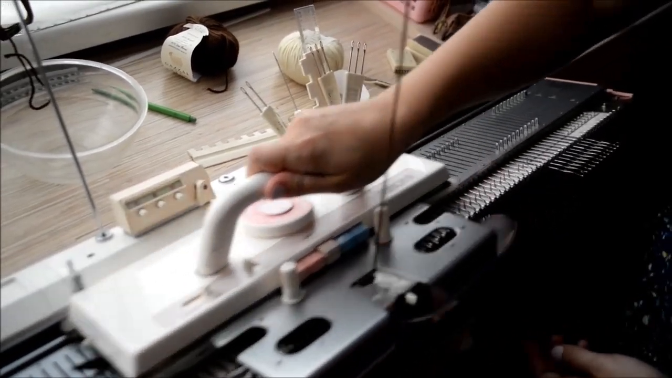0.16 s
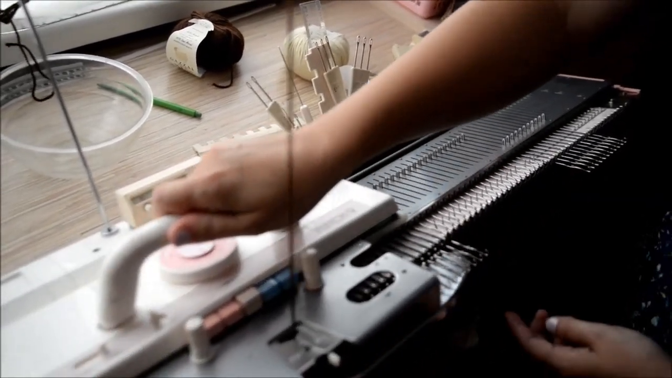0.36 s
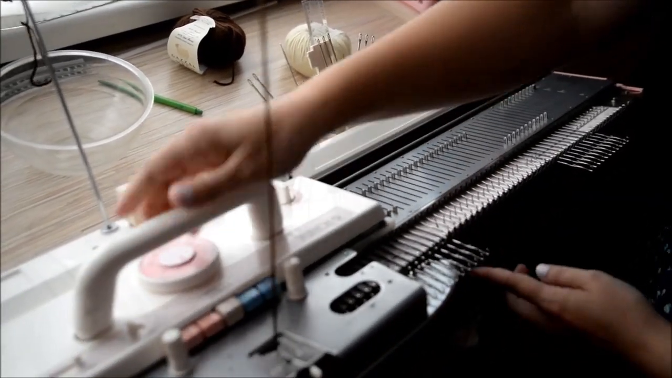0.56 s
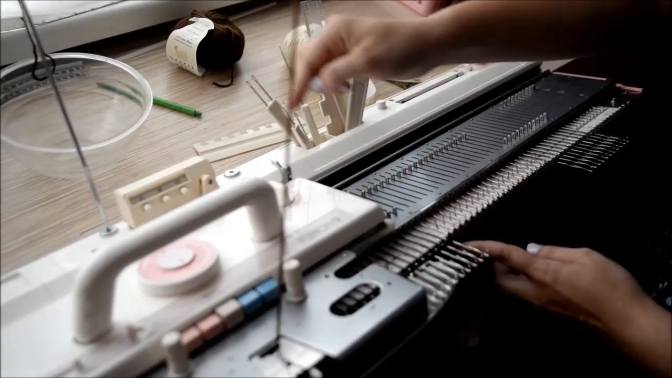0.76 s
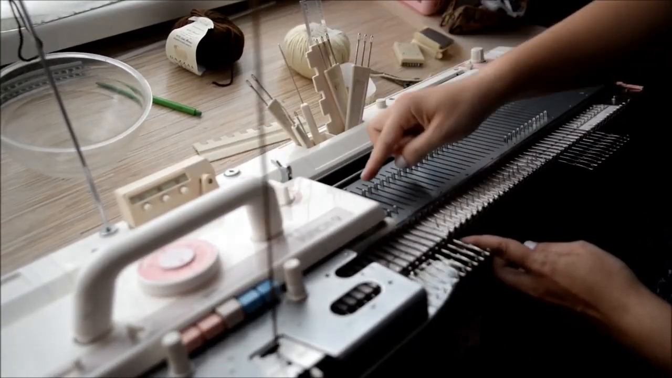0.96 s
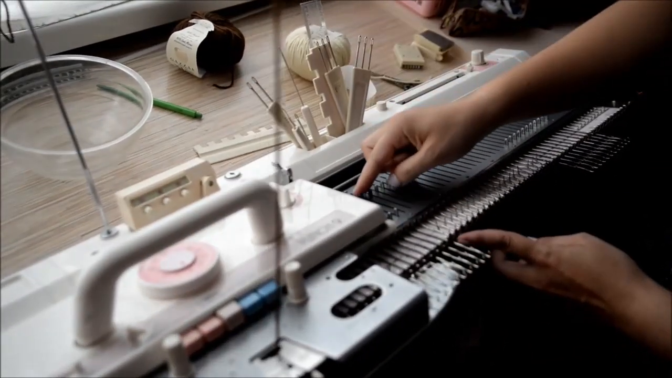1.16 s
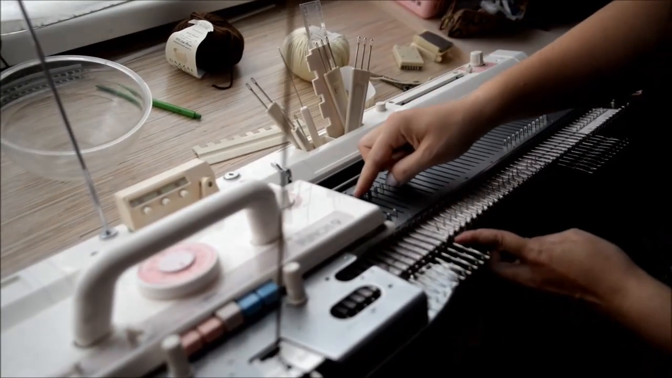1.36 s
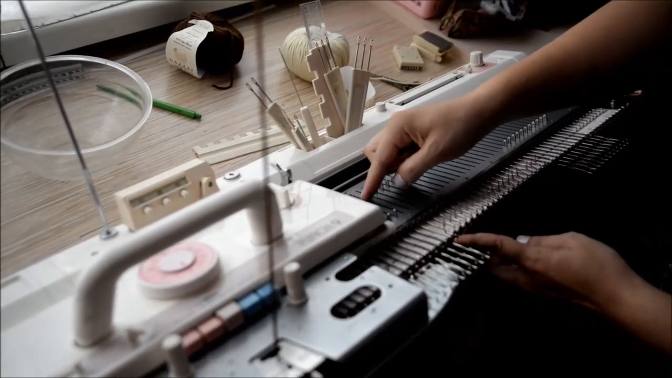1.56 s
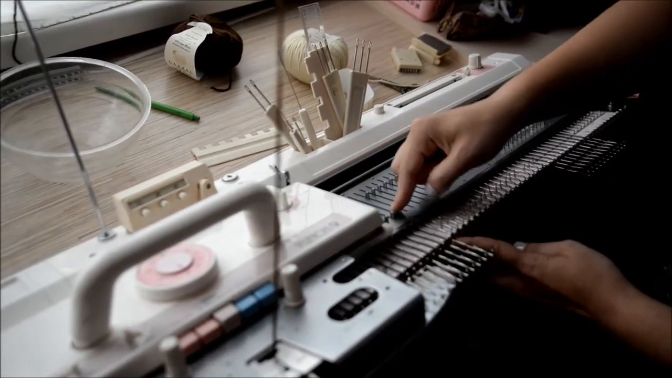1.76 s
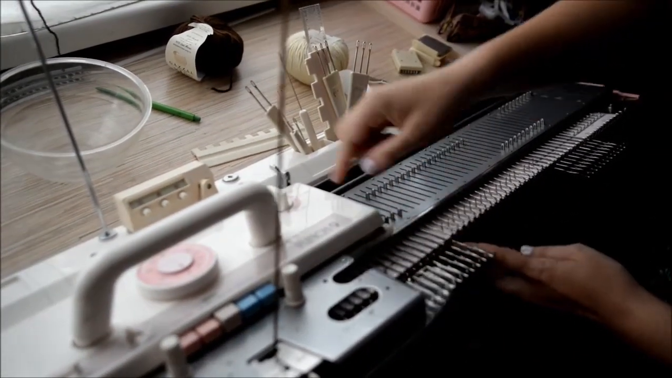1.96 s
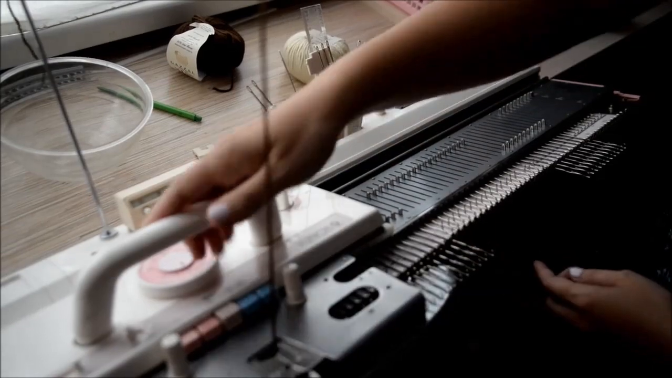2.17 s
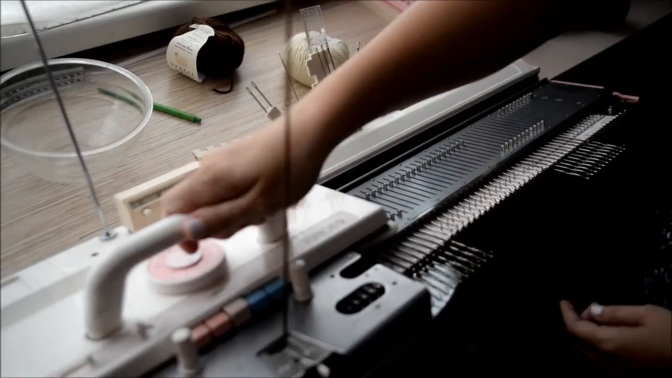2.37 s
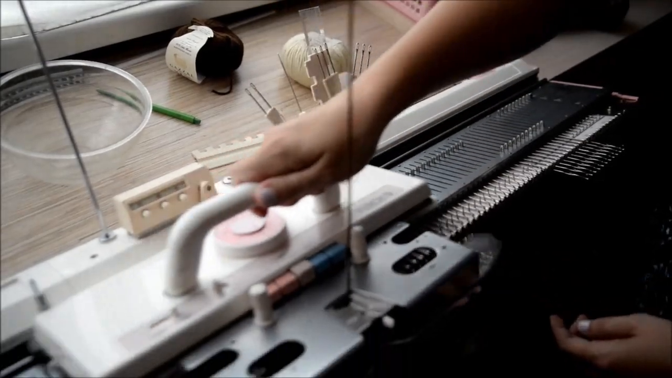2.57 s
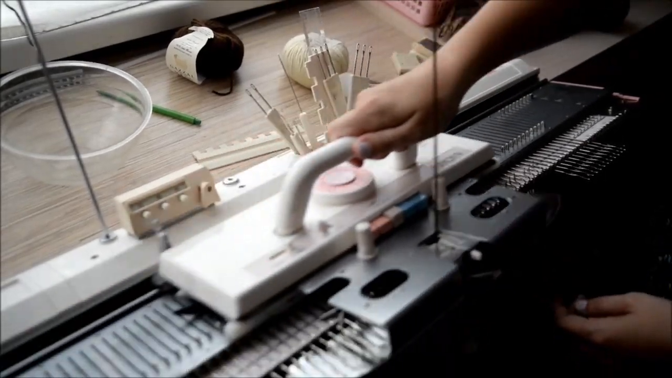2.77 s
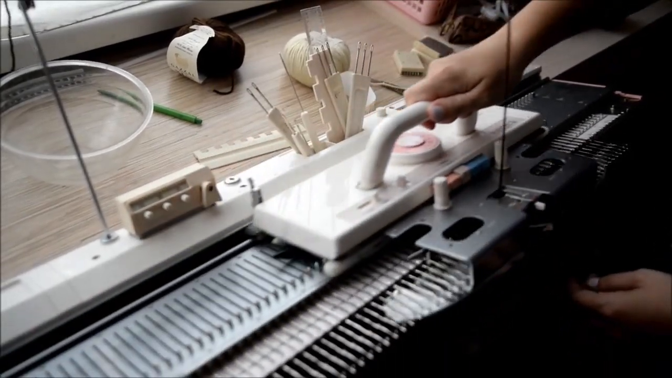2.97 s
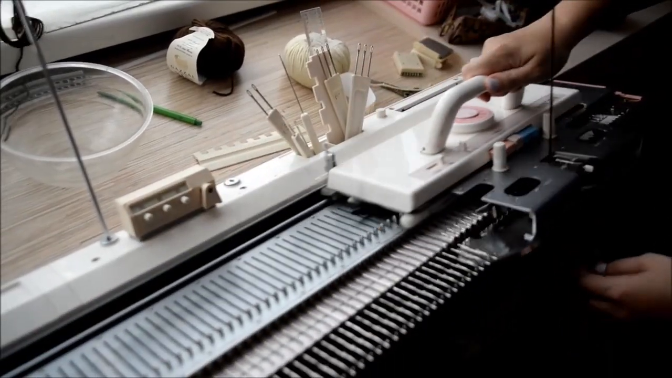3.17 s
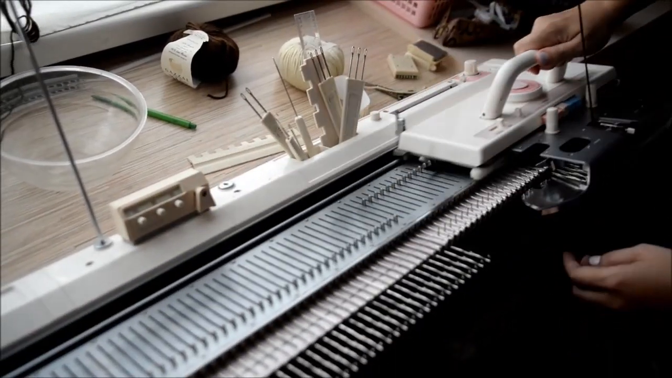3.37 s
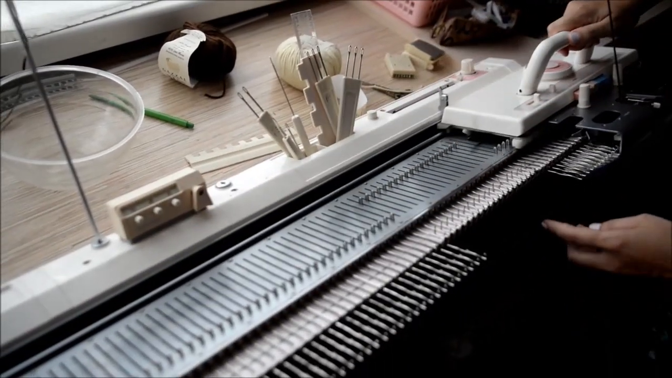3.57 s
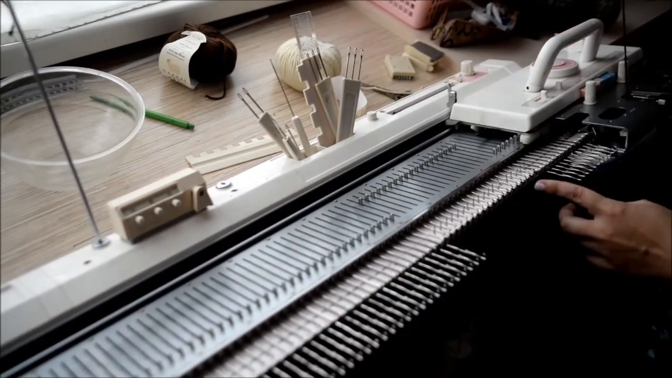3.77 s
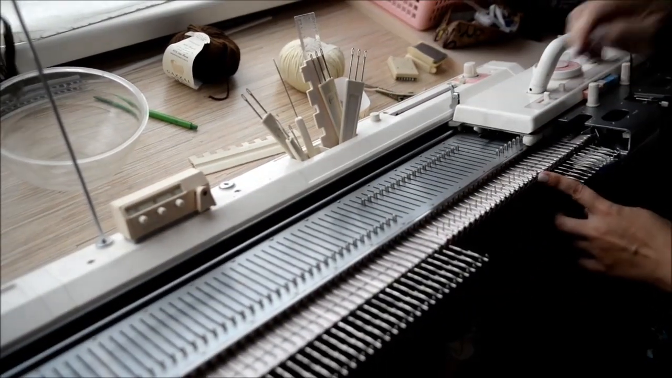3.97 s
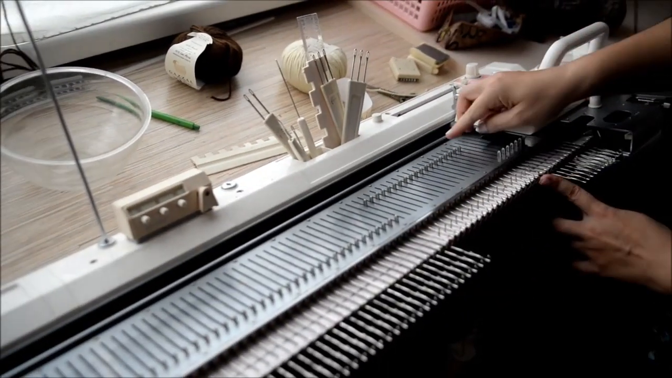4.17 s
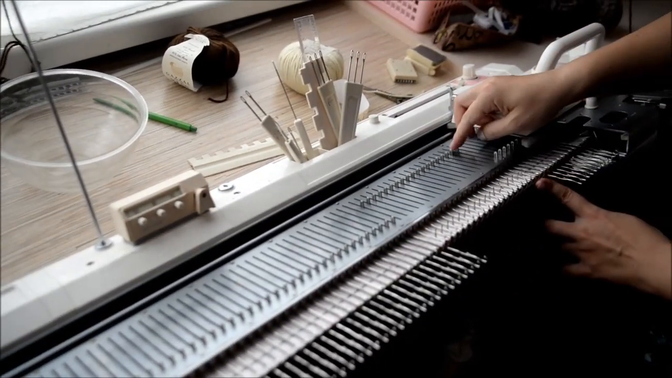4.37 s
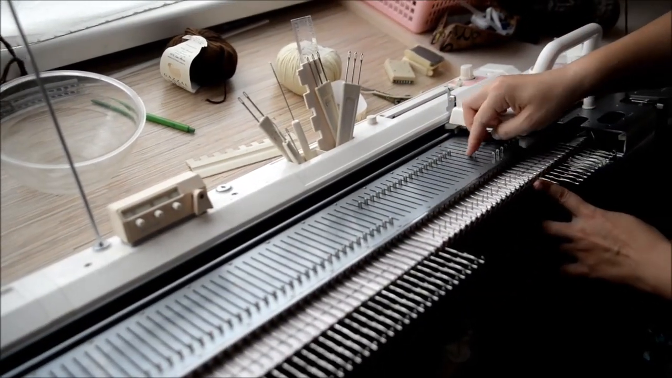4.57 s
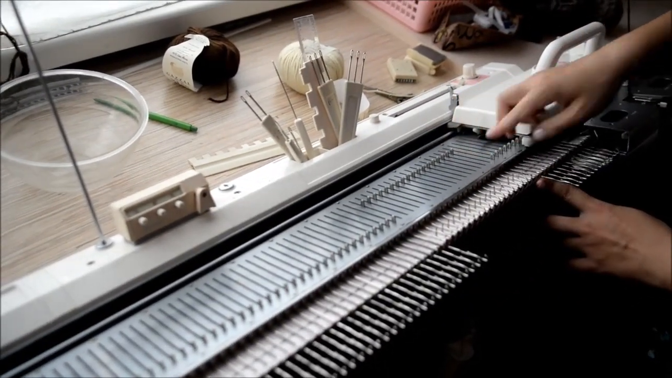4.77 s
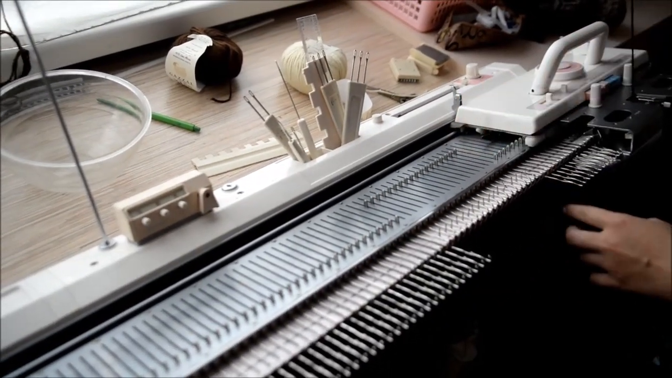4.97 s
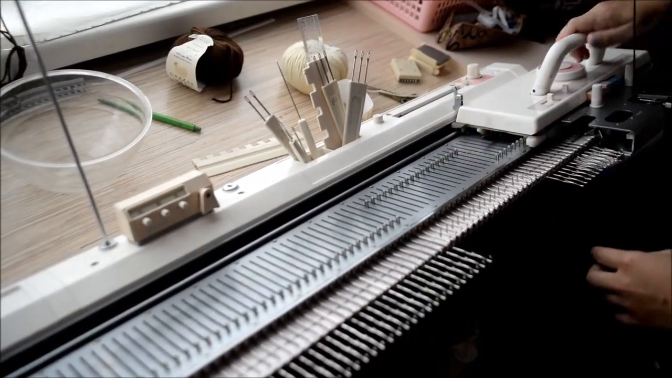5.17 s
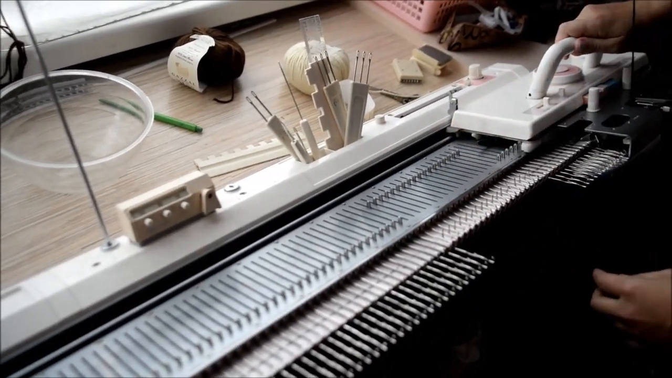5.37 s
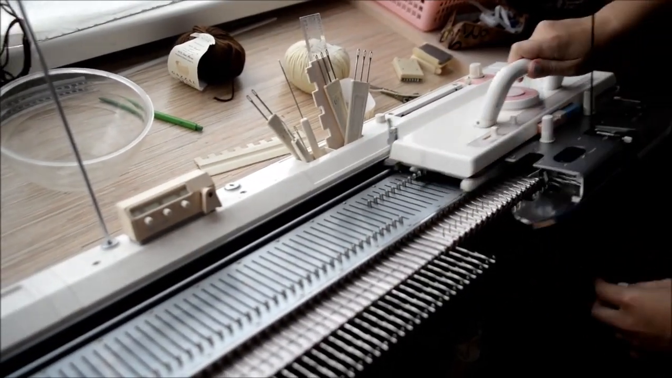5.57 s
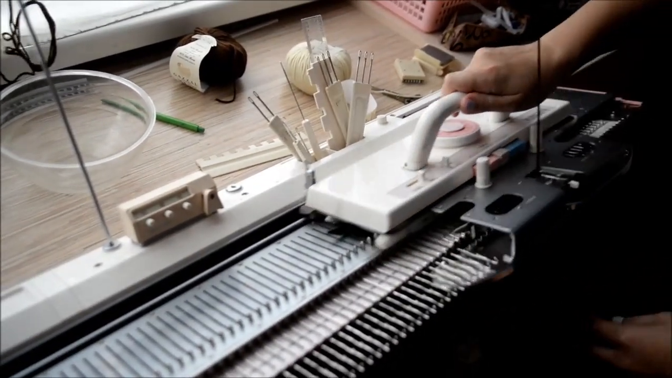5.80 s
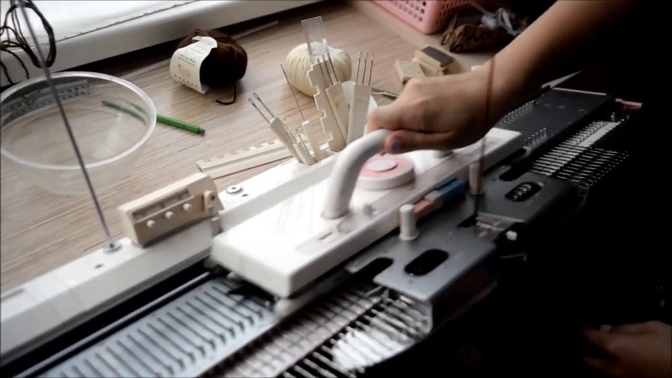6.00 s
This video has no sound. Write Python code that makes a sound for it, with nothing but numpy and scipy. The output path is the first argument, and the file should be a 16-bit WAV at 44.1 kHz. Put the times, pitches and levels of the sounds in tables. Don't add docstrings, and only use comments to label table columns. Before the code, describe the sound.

Close in a small furnished room, a knitting machine carriage clatters along steel needles, slowing to a stop. Faint skin rubs and light metal clicks follow, then a long rattling pass swells and eases. More soft brushing, a loud needle snap and a dull handle bump lead into a third pass, building until it is cut off. Quiet hum and hiss lie behind.

```python
import sys
import numpy as np
from scipy import signal
from scipy.fft import rfft, irfft, next_fast_len
from scipy.io import wavfile
from scipy.ndimage import uniform_filter1d

SR = 44100
rng = np.random.default_rng(int(sys.argv[2]) if len(sys.argv) > 2 else 0)


def wav_record(signal):
    frames = np.transpose(np.atleast_2d(signal))
    bounded = np.clip(frames, -1, 1)
    quanta = np.round(bounded * 32767).astype(np.int16)
    wavfile.write(sys.argv[1], SR, quanta)


def invert_db(x):
    u = np.asarray(x, float) / 20
    return 10 ** u


N = 266231
T = np.arange(N) / SR
SIZE = next_fast_len(N + SR)
HZ = np.maximum(np.arange(SIZE // 2 + 1) * SR / SIZE, 1)


def unit(x):
    return x / np.sqrt(np.mean(x ** 2))


def shape(points, rings=()):
    hz, db = np.transpose(points)
    out = np.interp(np.log(HZ), np.log(hz), db)
    for f, width, lift in rings:
        nearness = 1 / (1 + (2 * (HZ - f) / width) ** 2)
        out = out + 20 * np.log10(1 + (invert_db(lift) - 1) * nearness)
    return out


def ring(x, db):
    cep = irfft(db * np.log(10) / 20, SIZE)
    cep[1:SIZE // 2] *= 2
    cep[SIZE // 2 + 1:] = 0
    return irfft(rfft(x, SIZE) * np.exp(rfft(cep)), SIZE)[:len(x)]


def bands(x, edges_hz):
    spectrum = rfft(x, SIZE)
    lows = [irfft(spectrum / (1 + (HZ / f) ** 8), SIZE)[:len(x)] for f in edges_hz]
    return np.diff([0 * x] + lows + [x], axis=0)


def walk(rate):
    k = int(SR / rate)
    held = np.repeat(rng.standard_normal(N // k + 1), k)
    return uniform_filter1d(uniform_filter1d(held, k), k)[:N]


def fade(impulses, seconds):
    return signal.lfilter([1], [1, -np.exp(-1 / (seconds * SR))], impulses)


def narrow(hz, db, width_hz):
    pole = np.exp(-np.pi * width_hz / SR)
    push = signal.lfilter([1], [1, -pole], rng.standard_normal((2, N)))
    turn = np.exp(2j * np.pi * np.cumsum(hz + 0 * T) / SR)
    return invert_db(db) * unit(np.real((push[0] + 1j * push[1]) * turn))


def small_rings(rows):
    out = np.zeros(N)
    for s, db, hz, t60 in rows:
        t = np.maximum(T - s, 0)
        envelope = np.minimum(t * hz / 0.87, 1) * np.exp(-np.log(1000) * t / t60)
        out += invert_db(db) * envelope * np.sin(2 * np.pi * hz * t)
    return out * invert_db(4.1 * walk(120))


# f/Hz, level/dB per Hz
ROOM_TONE = [(15, -45), (25, 0), (87, -11), (149, -1.5), (229, -6.5), (354, -6), (714, -11.5), (818, -8.5),
             (936, -12.5), (1040, -9), (1740, -19.5), (5570, -23.5), (7310, -29), (14800, -31),
             (16000, -41.5)]
ROOM_TONE_DB = -59.5


def hush():
    hums = [(141, 15, 8.3), (228.5, 35, 6), (1210, 16, 1.6), (985, 37, 1.7)]
    tone = ring(rng.standard_normal(N), shape(ROOM_TONE, hums))
    *low_bands, hiss = bands(tone, (90, 190, 400, 900, 2000))
    wandering = sum(band * invert_db(1.8 * walk(1.3)) for band in low_bands)
    return invert_db(ROOM_TONE_DB) * unit(hiss + wandering)


def far_appliance():
    middle_s, half_s, whine_hz, whine_db = 5.17, .17, 1205, -69
    swell = np.exp(-((T - middle_s) / half_s) ** 2)
    return swell * narrow(whine_hz, whine_db + 4.6 * walk(15), 30.)


# f/Hz, level/dB per Hz
SKIN_COLOUR = [(500, -23.5), (1200, -2.5), (2500, -6.5), (4000, -4), (5500, -3), (7000, -5), (8300, -17.5),
               (14000, -33)]
# start t/s, length t/s, level/dB
STROKES = [
    (1.74, 0.024, -58),
    (2.2, 0.023, -62),
    (4.033, .12, -59),
    (4.278, .015, -64),
    (4.525, .03, -64),
    (4.614, 0.017, -47.5),
]
# middle t/s, half length t/s, level/dB
RUSTLES = [
    (0.599, 0.18, -67.5),
    (1.7, 0.12, -81),
    (1.816, 0.077, -60),
    (2.155, .17, -66.5),
    (3.72, 0.088, -55.5),
    (3.95, .15, -69.5),
    (4.175, 0.059, -63.5),
    (4.48, .1, -71),
    (4.85, 0.21, -69),
    (5.36, 0.054, -66),
]


def finger():
    resting_db, attack_s, release_s = -77.5, .006, 0.01
    grain = rng.standard_normal(N) * invert_db(3. * walk(60))
    gain = invert_db(resting_db)
    for s, half, db in RUSTLES:
        gain = gain + invert_db(db) * np.exp(-((T - s) / half) ** 2)
    for s, length, db in STROKES:
        attack = np.clip((T - s) / attack_s + .5, 0, 1)
        release = np.exp(-np.maximum(T - s - length, 0) / release_s)
        gain = gain + invert_db(db) * attack * release
    return gain * invert_db(-2.5) * unit(ring(grain, shape(SKIN_COLOUR)))


# t/s, peak level/dB, f/Hz, t60/s
LATCHES = [
    (1.693, -44, 3950, .03),
    (1.708, -45, 900, .055),
    (1.754, -42, 3950, .03),
    (4.42, -42, 3980, .022),
    (4.425, -46, 1450, .06),
    (4.6365, -24, 2650, .013),
    (2.2146, -41, 1550, .035),
]


def latches():
    return small_rings(LATCHES)


# t/s, peak level/dB,
# f/Hz, t60/s
THUMPS = [(2.218, -52, 261, .12), (2.225, -54, 520, .07), (5.22, -55, 90, .15), (5.25, -55, 230, .13),
          (5.292, -52, 305, .085), (5.33, -56, 394, .09), (5.37, -52, 400, .07), (5.49, -35, 114, .14),
          (3.6, -41, 113, .1), (4.43, -54, 600, .05), (1.788, -41, 960, .11), (1.795, -43, 1110, .1),
          (1.79, -41, 720, .12), (3.58, -40, 1620, .1), (3.625, -43, 1600, .1)]


def hand():
    return small_rings(THUMPS)


# f/Hz, level/dB per Hz
NEEDLE_COLOUR = [(300, -23.5), (550, -3.5), (950, 0.5), (1500, 2.5), (2600, -5.5), (4000, -8), (6200, -8),
                 (8000, -12), (10000, -17), (15500, -34.5)]
# t/s, peak level/dB, knock level/dB re tick, ring f/Hz
FLICKS = [(0.6724, -64, -13, 5500), (0.7527, -55, -10, 5800), (1.0093, -53.5, -7.5, 2190),
          (1.168, -54.5, -15, 6290), (1.469, -57.5, -.5, 1670), (1.502, -55, -7, 1390),
          (1.6925, -42, -9.5, 3900), (1.7554, -42.5, -1.5, 4050), (1.7825, -23, -7, 3790),
          (2.2151, -38.5, -7.5, 1580), (2.367, -40.5, -33, 5640), (2.385, -32.5, -33, 5900),
          (2.398, -29, -15, 3800), (2.4334, -24.5, -17, 4600), (3.5807, -29.5, -7.5, 3040),
          (3.6722, -35.5, -24, 1600), (3.883, -55, -14, 2760), (4.2672, -51, -14, 6200),
          (4.364, -42.5, -35.5, 4280), (4.411, -47.5, -7.5, 5320), (4.4195, -39, -17, 1340),
          (4.5166, -54.5, -9, 6340), (4.6364, -24, -6, 2500), (5.186, -54, -6, 6900),
          (5.5017, -40, -22, 5360)]


def flicks():
    n = 16384
    out = np.zeros(N + n)
    t = T[:n]
    t60_s = 0.032 * np.array([[3.7], [1], [1.0], [0.61], [8.6]])
    envelope = np.minimum(t / 0.00093, 1) * np.exp(-np.log(1000) / t60_s * t)
    steel = ring(rng.standard_normal(N), shape(NEEDLE_COLOUR))
    noise = np.array([unit(band) for band in bands(steel, (2900, 7300))])
    for s, db, knock_db, hz in FLICKS:
        i = int(s * SR)
        burst = noise[:, i:i + n]
        shiver = (burst[1] + 1.18 * burst[0])[::-1]
        voices = np.vstack([burst, np.sin(2 * np.pi * hz * t), shiver])
        edge_db = -14 + 10 * np.log2(hz / 4000)
        levels = invert_db(np.array([knock_db, 0, edge_db, 0, -18.5]))
        out[i:i + n] += invert_db(db - 3.5) * (levels @ (envelope * voices))
    return out[:N]


def cams(travel):
    rattles_per_needle, loose_db, grain_s, slide_db, butt = 12., 0.5, 0.00021, 3.0, 5.
    scatter_db, jitter_s, rise_s, chatter_s = .8, .0003, .0035, .0036
    s, count = np.transpose(travel)
    passed = uniform_filter1d(np.interp(T, s, count), 2000)
    speed = np.gradient(passed) * SR + 10
    chance = rng.standard_normal((100, 2))
    whole = np.arange(0, count[-1])
    at = (np.interp(whole, count, s) + jitter_s * chance[:len(whole), 0]) * SR
    gate = np.zeros(N)
    gate[np.clip(at.astype(int), 0, N - 1)] = invert_db(scatter_db * chance[:len(whole), 1])
    chatter = uniform_filter1d(fade(gate, chatter_s), int(rise_s * SR))
    strike = chatter / np.sqrt(np.maximum(speed, 48.) * chatter_s / 2)
    odds = rattles_per_needle * speed / SR
    knocks = (rng.random(N) < odds) * invert_db(2 * loose_db * rng.standard_normal(N)) / odds
    rattle = unit(np.sqrt(fade(knocks, grain_s)) * rng.standard_normal(N))
    slide = rng.standard_normal(N) * invert_db(slide_db + 2.0 * walk(40))
    return np.array([unit(rattle + slide) + butt * gate, strike])


# f/Hz, level/dB per Hz
NEAR_END = [(20, -59), (45, -28.5), (250, -24), (500, -14.5), (1100, -13), (1600, -8.5), (2300, -12),
            (3600, -7.5), (6000, -7), (8500, -18.5), (10000, -18.5), (11000, -29.5), (15500, -32)]
MIDDLE = [(20, -55.5), (45, -38), (250, -27.5), (600, -15.5), (1050, -16), (1400, -9), (1900, -14.5),
          (3300, -9), (5700, -2.5), (7000, -8.5), (9500, -22.5), (11500, -32), (15500, -35.5)]
FAR_END = [(20, -43.5), (45, -14), (250, -11), (500, -9), (1100, -14.5), (1600, -7.5), (2300, -12),
           (3200, -6.5), (5900, -1.5), (8000, -10.5), (10000, -18.5), (11000, -23.5), (15500, -27.5)]
# f/Hz, level/dB per Hz
RETURN = [(20, -56), (45, -26.5), (250, -25), (600, -12), (1050, -11), (1400, -7.5), (1900, -10.5),
          (3300, -9.5), (5700, -4), (7000, -9.5), (9500, -19), (11500, -27), (15500, -31.5)]
# f/Hz, width f/Hz, level/dB
NEAR_RINGS = [(116, 19, 7), (318, 25, 2.5), (508.5, 36, 8), (780, 110, 8.5), (1547, 120, 5),
              (3870, 450, 3.5), (4500, 98, 9.5), (5675, 350, 5), (7000, 300, 4.5), (8020, 300, 6.5),
              (9700, 1200, 2)]
MIDDLE_RINGS = [(58, 10, 15), (116, 10, 14), (312, 35, 9.8), (664, 71, 3.3), (897, 68, 4.6),
                (1660, 160, 2.8), (1940, 52, 3.9), (2700, 97, 2.5), (4700, 200, 2.4), (5820, 250, 5.4)]
FAR_RINGS = [(124, 57, 4.7), (308.7, 7.5, 16), (780, 250, 6.7), (1634, 46, 5.6), (1903, 70, 2.3),
             (2980, 47, 5.5), (4290, 320, 5.6), (5900, 100, 3.4), (7700, 260, 4.5), (9500, 420, 6.9)]


def bed(blows, near, stitches, far, way):
    places = [(near, shape(NEAR_END, NEAR_RINGS)), (stitches * (way > 0), shape(MIDDLE, MIDDLE_RINGS)),
              (far, shape(FAR_END, FAR_RINGS)), (stitches * (way < 0), shape(RETURN, MIDDLE_RINGS))]
    parts = 0
    for nearness, colour in places:
        split = bands(ring(blows, colour), (420, 2900, 8200))
        power = np.mean(split ** 2, axis=1, keepdims=True) / np.mean(blows != 0)
        parts = parts + nearness ** 0.92 * split / np.sqrt(power)
    return parts


# needle, f/Hz, level/dB re clatter
DRUM = [
    (16.964, 1440, -36),
    (26.13, 1405, -23),
    (33.73, 1385, -11),
    (40.07, 1375, -11.5),
    (41.3, 1320, -13),
    (52.27, 1290, -8.5),
    (56.78, 1260, -33.5),
]


def shell_drum(needle, loudness_db):
    at, hz, db = np.transpose(DRUM)
    drum_db = np.interp(needle, at, db, left=-90, right=-90)
    return narrow(np.interp(needle, at, hz), loudness_db + drum_db, 90.)


# needle, level/dB re clatter
SING = [
    (34, -30),
    (42, -9),
    (51, -7),
    (55, -14),
    (61, -8),
    (64, -23),
]


def taut_needles(needle, strike, push_db):
    return strike * narrow(5800, push_db + np.interp(needle, *np.transpose(SING)), 340)


# t/s, needles passed
TRAVEL = [
    [(-.009, -1), (.247, 16), (.301, 19), (.344, 21), (.398, 23), (.434, 24), (.501, 26), (.56, 27)],
    [(2.396, 0), (2.443, 1), (2.537, 4), (2.608, 7), (2.683, 11), (3.23, 46), (3.462, 62), (3.579, 67),
     (3.673, 70)],
    [(5.366, 0), (5.433, 3), (5.5, 7), (5.608, 15), (5.66, 19), (5.943, 38), (6.041, 44)],
]
# t/s, clatter level/dB
PUSH = [
    [(0, -15.5), (0.08, -17.0), (0.17, -20), (0.26, -24), (0.43, -31.5), (0.48, -38), (0.53, -52.5),
     (0.6, -64)],
    [(2.366, -42.5), (2.54, -24.5), (2.77, -18), (3.12, -18), (3.24, -17.5), (3.45, -25), (3.5, -34.5),
     (3.64, -41.5), (3.73, -58.5)],
    [(5.355, -55.5), (5.48, -40), (5.52, -33), (5.6, -29), (5.66, -21.5), (5.71, -18.5), (5.8, -19),
     (5.97, -14), (6.037, -16)],
]
# needle where counting starts, direction (+1 outward, -1 returning), pull of the stitches level/dB
PASSES = [
    (32, -1, -15.),
    (0, 1, -2),
    (73.9, -1, 1),
]
# table, shell, fizz, leading-cam strike, all level/dB re clatter
OUTWARD = [
    (-24.5, -10.5, -13.5, 2.5),
    (-26, -7, -12.5, -7),
    (-23, -9.5, -11.5, -1),
]
HOMEWARD = [
    (-21.5, -7.5, -10.5, -2),
    (-29.5, -8, -16, -9),
    (-20, -3, -13, -5.5),
]


def carriage():
    first_stitch, last_stitch, cam_needles, full_push_db = 20, 55, 6, -18
    db = np.interp(T, *np.transpose(np.concatenate(PUSH)))
    inside = [1. * (T >= push[0][0]) * (T <= push[-1][0]) for push in PUSH]
    moving = np.array([uniform_filter1d(on, 600) for on in inside])
    blows, strike = sum(on * cams(travel) for on, travel in zip(moving, TRAVEL))

    current = np.argmax(moving, axis=0)
    start, way, pull_db = np.array(PASSES)[current].T
    passed = np.choose(current, [np.interp(T, *np.transpose(travel)) for travel in TRAVEL])
    needle = np.round(start) + np.sign(way) * passed
    near = np.clip(.5 + (first_stitch - needle) / cam_needles, 0, 1)
    far = np.clip(.5 + (needle - last_stitch) / cam_needles, 0, 1)
    stitches = 1 - near - far
    stretch = np.array([near, stitches, far])
    levels = np.where(way > 0, np.transpose(OUTWARD) @ stretch, np.transpose(HOMEWARD) @ stretch)
    table_db, shell_db, fizz_db, strike_db = levels

    reach = invert_db(strike_db + np.array([[-20.], [-6.], [2.5], [5.]]))
    swell = np.sqrt((1 + (reach * strike) ** 2) / (1 + reach ** 2))
    lost = full_push_db - db
    table_db = table_db + 0.48 * lost + 3.5 * walk(14)
    share_db = np.array([table_db, shell_db + 0.042 * lost, 0 * db, fizz_db - .12 * lost])
    parts = bed(blows, near, stitches, far, way)
    clatter = np.sum(invert_db(db - 1.0 + share_db) * swell * parts, axis=0)
    drum = moving.sum(axis=0) * shell_drum(needle, db + pull_db)
    return clatter + drum + taut_needles(needle, strike, db)


# f/Hz, t60/s
ROOM_T60 = [
    (300, 0.69),
    (2000, 0.33),
    (8000, 0.25),
]


def room(x, wet_db=-7.5):
    t = T[:SR // 2]
    tail = 0
    for band, (_, t60) in zip(bands(rng.standard_normal(len(t)), (700, 4000)), ROOM_T60):
        tail = tail + band * np.exp(-np.log(1000) * t / max(t60, .05))
    tail = tail * np.minimum(t / 0.0016, 1)
    return x + invert_db(wet_db) * signal.fftconvolve(x, tail / np.sqrt(np.sum(tail ** 2)))[:N]


def scene():
    table = signal.butter(2, 48., "high", fs=SR, output="sos")
    machine = signal.sosfilt(table, carriage())
    whine = far_appliance()
    needles = room(flicks(), wet_db=-11)
    return (room(machine + hand()) + needles + latches() + finger() + hush() + whine)[None]


def roll_off(x):
    return signal.sosfilt(signal.butter(12, 16330, fs=SR, output="sos"), x)


def record(dry):
    rounded = np.tanh(1.1 * dry) / 1.1
    top_cut = signal.ellip(10, .2, 70, 15800, fs=SR, output="sos")
    return roll_off(signal.sosfilt(top_cut, rounded))


dry = scene()
out = record(dry)
wav_record(out)
```